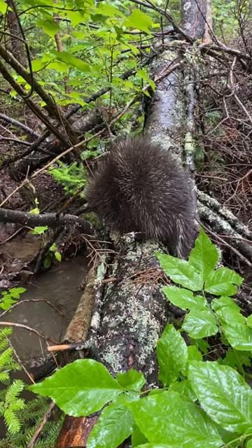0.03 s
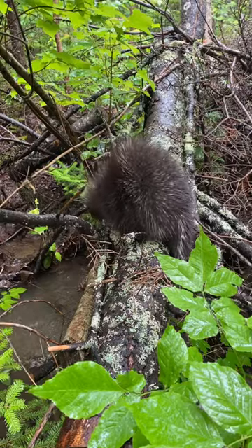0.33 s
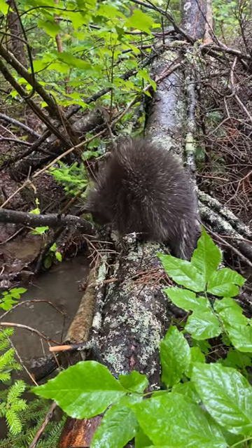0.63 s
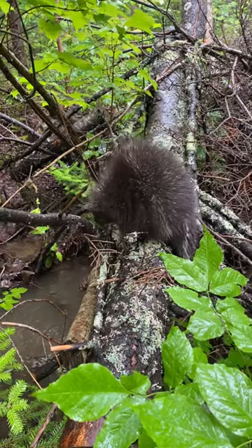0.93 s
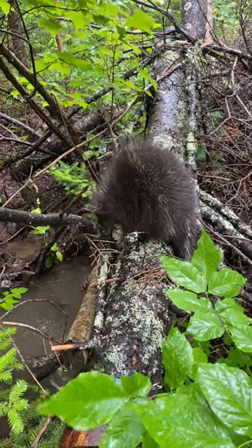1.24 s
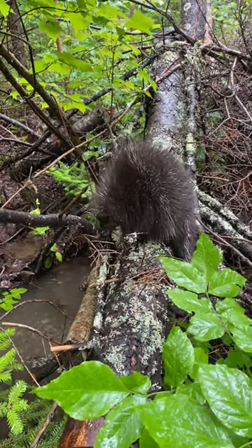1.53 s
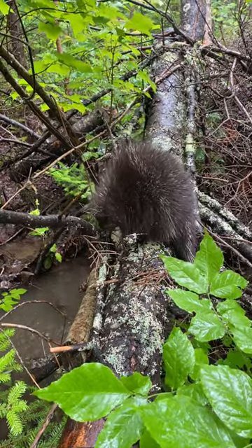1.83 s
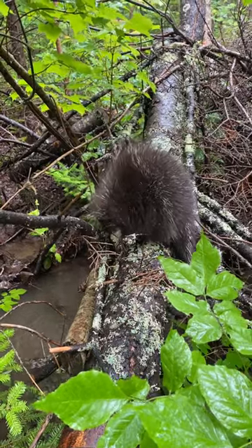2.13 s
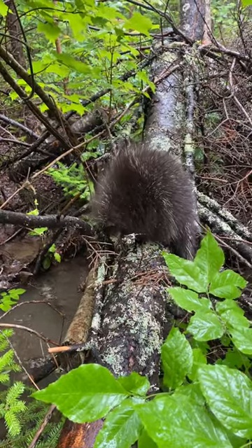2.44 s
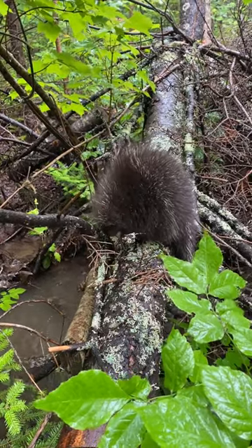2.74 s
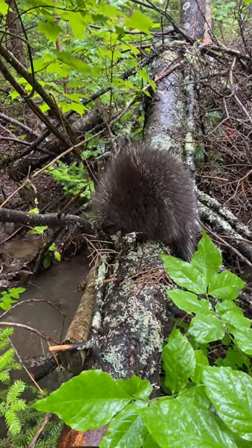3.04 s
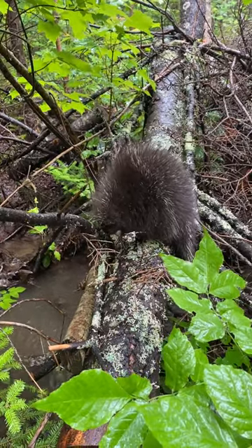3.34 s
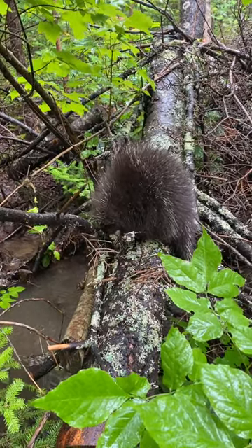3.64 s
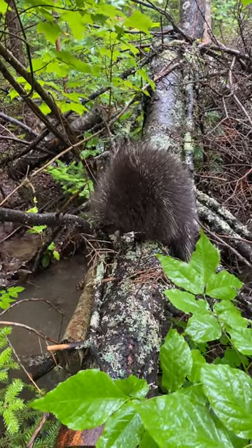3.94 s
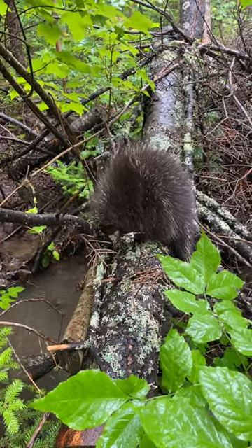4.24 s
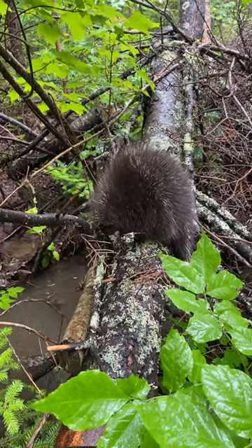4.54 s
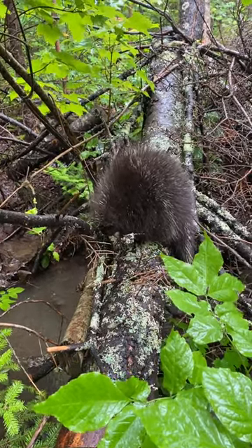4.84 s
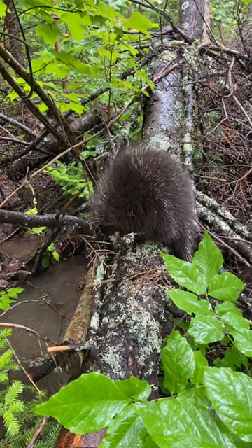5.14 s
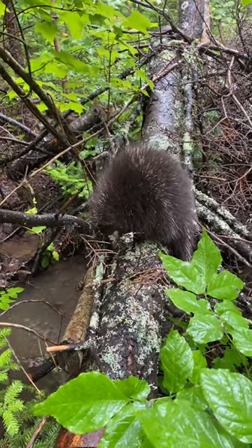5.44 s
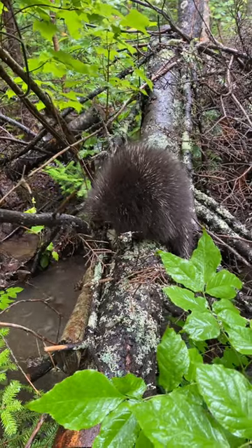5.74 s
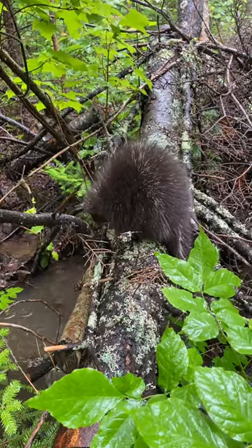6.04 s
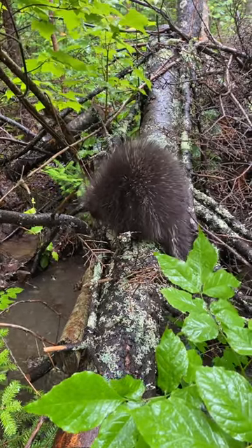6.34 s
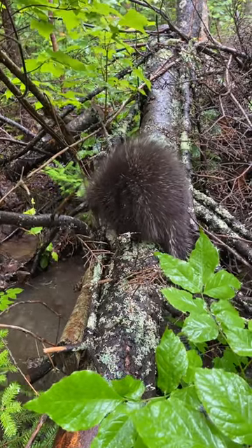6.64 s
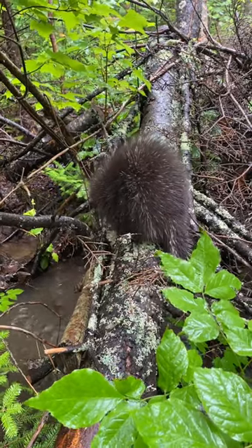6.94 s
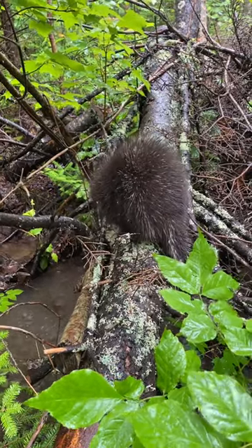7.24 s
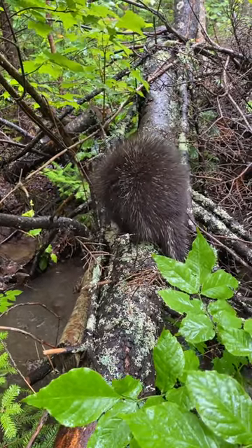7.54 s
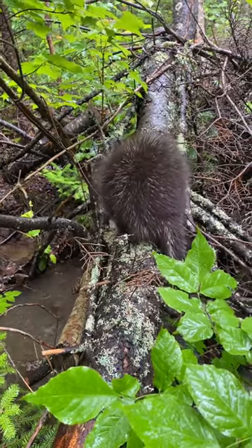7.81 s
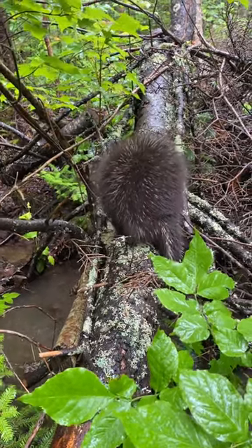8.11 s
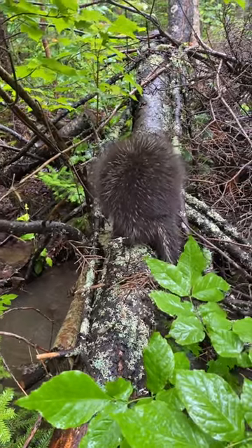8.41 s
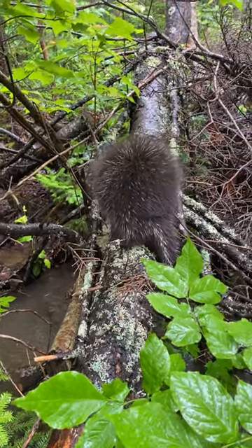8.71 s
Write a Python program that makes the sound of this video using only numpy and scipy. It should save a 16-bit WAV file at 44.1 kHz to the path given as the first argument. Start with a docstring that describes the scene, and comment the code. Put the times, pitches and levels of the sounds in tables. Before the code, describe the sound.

Steady, fairly quiet rain falls on forest leaves throughout, a wash of far drops with a nearer patter, growing slightly heavier. Faint bubbles plink in a pool over a low rumble of air. A soft puff of air and a dull rustle open the sound. Sharp drips tick on close leaves and twigs, often in the first 1.5 seconds and again from about 3.3 to 6 seconds. Light scuffs and soft knocks touch the hand-held microphone at about 1.2 and 5.1 seconds, each with a small swell of rustle. From about 6.8 seconds the rustle builds again. Between 7.2 and 7.4 seconds a quick cluster of knocks and scuffs peaks in one hard, low bump, by far the loudest sound, trailed by a brief deep hum. A clear drip ticks at 8 seconds, and a few soft knocks follow until about 8.6 seconds as the rain continues.

```python
"""Steady rain on forest leaves and a pool: a wash of far drops, a patter of nearer ones, single ticks
close to the microphone and faint plinks of bubbles in the water. Underneath, a dull rustle swells
and fades over a low rumble of air. The hand-held camera takes brief scuffs, a few soft knocks and
one hard bump. Its two microphone ports hear the treble out of step."""
import sys
import numpy as np
from scipy import signal
from scipy.fft import rfft, irfft, next_fast_len
from scipy.io import wavfile
from scipy.ndimage import map_coordinates

SR = 44100
rng = np.random.default_rng(int(sys.argv[2]) if len(sys.argv) > 2 else 0)


def persist_wave(psi):
    """Save psi, clipped to +-1, as 16-bit WAV."""
    counts = np.round(np.clip(psi, -1, 1) * 32767).astype(np.int16)
    wavfile.write(sys.argv[1], SR, np.atleast_2d(counts).T)


N = 391166


def amp(db):
    """Decibels to gain."""
    return 10 ** (np.asarray(db) / 20)


def unit(x):
    """x scaled to rms 1."""
    return x / np.sqrt(np.mean(x ** 2) + 1e-20)


def along(points, hz):
    """Read (freq_hz, value) points on a log frequency axis."""
    freqs, values = np.transpose(points)
    return np.interp(np.log(hz + 1), np.log(freqs + 1), values)


def wobble(rate_hz):
    """A smooth random curve with rate_hz knots a second."""
    knots = rng.standard_normal(int(N * rate_hz / SR) + 4)
    return map_coordinates(knots, [np.arange(N) * rate_hz / SR])


def filtered(x, response):
    """Filter x by a complex response, given as a function of frequency."""
    size = next_fast_len(N + SR // 2)
    return irfft(rfft(x, size) * response(np.fft.rfftfreq(size, 1 / SR)), size)[..., :N]


def add(track, start_s, sound):
    """Mix a sound into a track at start_s."""
    span = track[round(start_s * SR):][:len(sound)]
    span += sound[:len(span)]


def ports(pair, spectrum):
    """Two unrelated signals at the microphone ports: coloured, partly alike and out of step."""
    # likeness of left and right: freq_hz, likeness (0-1)
    alike = [(150, 0.98), (500, 0.83), (1000, 0.46), (1800, 0.88), (2650, 0.67), (3700, 0.55), (4300, 0.72),
             (5100, 0.94), (6000, 0.96), (7200, 1.0), (15000, 1)]
    # left level over right: freq_hz, balance_db
    balance = [(150, -0.5), (700, -3.5), (1400, -2), (2000, -0.5), (2800, -1.9), (4300, -1.5), (5200, -0.2)]
    # left phase ahead of right: freq_hz, lead_rad
    lead = [(100, 0), (650, -0.45), (1700, -0.06), (2600, 1.02), (3600, 0.54), (4250, 1.16), (5100, 0.14),
            (5800, 1.23), (7000, 3.12), (8200, 3.42), (10000, 6.28), (11500, 6.39), (12700, 9.33),
            (14500, 9.52), (15500, 12.39)]

    def split(hz):
        angle = np.arccos(np.clip(along(alike, hz), 0, 1)) / 2
        return amp(along(spectrum, hz)) * [np.cos(angle), np.sin(angle)]

    def skew(hz):
        half = np.array([[.5], [-.5]])
        return amp(half * along(balance, hz)) * np.exp(1j * half * along(lead, hz))

    shared, apart = filtered(pair, split)
    return filtered(np.array([shared + apart, shared - apart]), skew)


def drops(per_second, spread_db, pitch_hz, cycles):
    """Drops land at random times; each shakes its leaf, which settles within a cycle or two."""
    when, distance, tone, phase = rng.random((int(per_second * N / SR), 4)).T
    t = np.arange(128) / SR
    hz = np.clip(pitch_hz * 2 ** (3 * tone - 2), 300, 16000)[:, None]  # leaves of all sizes
    gain = amp(-spread_db * np.log(0.035 + distance))[:, None]  # few land near, many far
    envelope = gain * np.sqrt(hz) * np.exp(-t * hz / cycles)
    taps = envelope * np.cos(2 * np.pi * (hz * t + phase[:, None]))
    index = (when * N).astype(int)[:, None] + np.arange(len(t))
    return unit(np.bincount(index.ravel(), taps.ravel(), N)[:N])


def rain(start_db=-48, growth_db_per_s=0.2662, patter_db=-7, flutter_db=0.84, spray_db=-10, sway_db=3):
    """Far drops merge into a wash; nearer ones patter and throw off flurries of fine spray."""
    # spectrum of rain on foliage: freq_hz, gain_db
    foliage = [(60, -16), (200, -4), (600, -3.5), (1200, -6), (2000, -1.5), (2850, -0.9), (4000, -3),
               (4550, -4.5), (5000, -2), (6000, -3.5), (8000, -4), (10500, -8), (13000, -10.5),
               (14300, -18), (15700, -34)]
    wash = rng.standard_normal((2, N)) * amp(flutter_db * np.array([wobble(14), wobble(27)]))
    patter = np.array([drops(per_second=900, spread_db=1.5, pitch_hz=4290, cycles=0.4) for _ in range(2)])
    spray = np.array([drops(per_second=600, spread_db=2, pitch_hz=10900, cycles=0.93) for _ in range(2)])
    flurries = amp(spray_db + sway_db * np.tanh(wobble(6.6) + wobble(22)))  # tanh keeps them gentle
    level_db = start_db + growth_db_per_s * np.arange(N) / SR  # the rain slowly grows heavier
    return amp(level_db) * unit(ports(wash + amp(patter_db) * patter + flurries * spray, foliage))


def swell(start_s, rise_s, hold_s, fade_db_per_s):
    """An envelope that rises evenly, holds and dies away."""
    age = np.arange(N) / SR - start_s
    return np.clip(age / rise_s, 0, 1) * amp(-fade_db_per_s * np.maximum(age - rise_s - hold_s, 0))


def rustle(rest_db=-68, lumps_db=1.5):
    """A dull, slightly lumpy rustle comes and goes beneath the rain."""
    # swells of the rustle: start_s, rise_s, hold_s, level_db, fade_db_per_s
    swells = [(0.0, 0.034, 0.2, -54, 10), (1.21, 0.11, 0.044, -50, 20), (5.093, 0.41, 0.073, -54, 8),
              (6.75, 0.62, 1.15, -49.5, 8)]
    # spectrum of the rustle: freq_hz, gain_db
    dull = [(60, -26), (150, -5), (350, -0.5), (600, -1.5), (1000, -4.5), (1800, -10.5), (4000, -29)]
    envelopes = [amp(db) * swell(start_s, rise, hold, fade) for start_s, rise, hold, db, fade in swells]
    strength = np.sqrt(amp(rest_db) ** 2 + np.sum(np.square(envelopes), axis=0))
    return strength * amp(lumps_db * wobble(90)) * unit(ports(rng.standard_normal((2, N)), dull))


def rumble(air_db=-62, sway_db=1, puff_db=-54.5, puff_middle_s=0.23, puff_half_width_s=0.32):
    """Open air rumbles faintly at the microphone, with one soft puff a little higher in pitch."""
    # spectrum of the steady air: freq_hz, gain_db
    air_spectrum = [(20, -46), (40, -13), (70, 0.5), (120, -3.5), (250, -14), (600, -40)]
    # spectrum of the puff: freq_hz, gain_db
    puff_spectrum = [(30, -24), (75, 1), (125, 1), (190, -8), (350, -10), (800, -19), (2000, -54)]
    air = amp(air_db + sway_db * wobble(5)) * unit(ports(rng.standard_normal((2, N)), air_spectrum))
    puff_gain = amp(puff_db) * np.exp(-((np.arange(N) / SR - puff_middle_s) / puff_half_width_s) ** 2)
    return air + puff_gain * unit(ports(rng.standard_normal((2, N)), puff_spectrum))


def scuffs(resonance_q=1.2):
    """Brief rubs right by the microphone: friction noise through one broad, steep-sided resonance."""
    # scuffs and soft taps around the camera: start_s, gain_db, length_s, centre_hz
    rubs = [(0.072, -46.5, 0.023, 750), (1.244, -43.5, 0.013, 1250), (4.613, -43, 0.008, 1900),
            (5.09, -43, 0.0061, 850), (5.412, -53, .012, 900), (7.243, -44, 0.028, 1700),
            (7.247, -37.5, 0.064, 360), (7.3098, -32, 0.0036, 1350), (7.318, -29, 0.014, 1310),
            (7.32, -40.5, 0.009, 2930), (7.355, -35.5, 0.0044, 900), (7.485, -47.5, 0.016, 5900),
            (8.586, -43.5, 0.0044, 800)]
    colour = [(200, 1.0), (1000, 2.0), (2000, -1.5), (4500, 4.5), (9000, 6.5)]  # freq_hz, gain_db
    track = np.zeros(N)
    for start_s, db, length_s, centre_hz in rubs:
        size = int(length_s * SR)
        resonance = signal.iirpeak(centre_hz, resonance_q, SR)
        friction = rng.standard_normal(SR // 8)
        rub = signal.lfilter(*resonance, signal.lfilter(*resonance, friction))[-size:]
        add(track, start_s, amp(db) * unit(rub) * np.sin(np.linspace(0, np.pi, size)))
    return ports(np.array([track, np.zeros(N)]), colour)


def drips(delay_s=0.0009, splash_t60=0.0045, ring_t60=0.016, flex_hz=700, flex_t60=0.004, flex_db=-6):
    """A close drop bursts in a sharp tick; its leaf or twig flexes with a dull pat and rings briefly."""
    # drops on the nearest leaves and twigs:
    # start_s, gain_db, tick_hz, width_octaves, ring_hz, ring_db (against the tick)
    close_drops = [(0.1027, -34, 6000, 3, 1500, -10), (0.3975, -30, 2400, 0.8, 1500, -7),
                   (0.4659, -29, 2700, 1.0, 2100, -6), (0.6635, -31, 4200, 1.4, 2150, -2),
                   (0.6765, -38, 10000, 0.8, 1500, -9), (0.8392, -28, 6500, 1.8, 2000, -4),
                   (0.9487, -34.5, 2400, 0.8, 2350, 4), (1.141, -32, 3200, 1.2, 1500, -9),
                   (1.2449, -27.5, 5000, 3, 2400, 5), (1.5218, -30.5, 3500, 2.2, 1500, -12),
                   (2.2005, -30.5, 5200, 0.91, 1500, -12), (3.339, -33, 10000, 0.6, 1500, -13),
                   (3.4013, -36, 10500, 0.5, 1500, -15), (3.436, -38, 5300, 1.5, 1500, -3),
                   (3.9209, -32, 12000, 0.6, 1500, -12), (3.952, -37, 2900, 1, 3050, -9),
                   (4.074, -40, 5000, 1, 5000, -9), (4.1795, -35, 10500, 0.9, 1500, -14),
                   (4.2666, -33, 6800, 0.9, 1500, -13), (4.33, -35, 2900, 0.7, 2900, -2),
                   (4.418, -41, 9000, 1.2, 1500, -11), (4.54, -32.5, 8000, 1.5, 1500, -9),
                   (4.6107, -28, 2700, 1.1, 2870, 0), (5.1373, -26.5, 3700, 2.3, 3500, -3),
                   (5.187, -32, 2500, 1, 2200, -9), (5.2439, -26.5, 3000, 2.3, 3200, -4),
                   (5.6125, -34.5, 2800, 0.74, 2830, 2), (5.62, -37, 10000, 0.8, 1500, -12),
                   (5.70, -33, 8000, 1.2, 1500, -6), (5.8852, -36, 3100, 1, 3100, -9),
                   (5.965, -36, 5000, 1.2, 1500, -6), (7.173, -25, 5300, 1.7, 1540, -4.5),
                   (8.0056, -24, 3500, 1.4, 2300, -12), (8.2422, -31, 6000, 1.1, 1500, -9)]
    colour = [(200, 7.1), (2500, 7.5), (5000, 10.0), (8000, 13.3), (15000, 3.2)]  # freq_hz, gain_db
    track, t = np.zeros(N), np.arange(SR // 40) / SR
    for start_s, db, tick_hz, octaves, ring_hz, ring_db in close_drops:
        edges_hz = np.clip(tick_hz * 2 ** (octaves * np.array([-.5, .5])), 100, [15000, 20000])
        splash = rng.standard_normal(len(t)) * amp(-60 * t / splash_t60)
        tick = signal.lfilter(*signal.butter(1, edges_hz, "bandpass", fs=SR), splash)
        ring = np.sin(2 * np.pi * ring_hz * t) * amp(-60 * t / ring_t60)
        pat = np.sin(2 * np.pi * flex_hz * t) * amp(-60 * t / flex_t60)
        parts = [(tick, 0), (ring, ring_db), (pat, flex_db)]
        drip = sum(amp(part_db) * part / np.linalg.norm(part) for part, part_db in parts)
        add(track, start_s + delay_s, amp(db) * drip)
    return ports(np.array([track, np.zeros(N)]), colour)


def plinks(per_second=14, pitch_hz=2950, octaves=0.35, cycles=13, rise=0.039, faint_db=-51, spread_db=1.9):
    """Drops on the pool trap small bubbles that ring and rise in pitch: a few clear, many faint."""
    # the clearest bubbles: start_s, gain_db, pitch_hz
    clear = [(0.5628, -42, 2780), (1.777, -42, 1710), (3.952, -43, 3050), (4.074, -45, 5000),
             (4.4355, -51, 10900), (5.885, -42, 3120)]
    colour = [(1000, -5), (3000, 4.0), (9000, 14.0)]  # freq_hz, gain_db
    count = int(per_second * N / SR)
    starts_s = rng.random(count) * N / SR
    faint = [(start_s, faint_db + spread_db * strength, pitch_hz * 2 ** (octaves * tone))
             for start_s, (tone, strength) in zip(starts_s, rng.standard_normal((count, 2)))]
    track, t = np.zeros(N), np.arange(SR // 25) / SR
    for start_s, db, hz in clear + faint:
        age = t * hz / cycles  # in decay times
        envelope = np.exp(-age) * (1 - np.exp(-10 * age))
        ring = np.sin(2 * np.pi * hz * t * (1 + rise * age / 2))
        add(track, start_s, amp(db) * envelope * ring)
    return ports(np.array([track, np.zeros(N)]), colour)


def knock(corner_hz, body_hz=62, lag_cycles=1.36, tilt=0.65, leak_db=-30):
    """A push on the camera body; each frequency arrives a cycle or so late, so the thud falls in pitch."""
    hz = np.fft.rfftfreq(SR // 2, 1 / SR) + 1
    bass_cut = 1 / np.sqrt(1 + (body_hz / hz) ** 8)
    contact = 1 / np.sqrt(1 + (hz / corner_hz) ** 10)
    treble_leak = amp(leak_db) / (1 + (hz / (6 * corner_hz)) ** 2)
    lag = np.exp(-2j * np.pi * lag_cycles * np.log(hz))
    thud = irfft(bass_cut * (contact + treble_leak) * hz ** -tilt * lag)[:SR // 4]
    return thud / np.abs(thud).max()


def handling(hum_start_s=7.37, hum_length_s=0.23, hum_hz=48, hum_db=-42, left_lag_s=0.00014):
    """Knocks travel through the body and reach the left port later; a deep hum follows the hard bump."""
    # knocks on the camera body: start_s, peak_db, corner_hz (higher is harder)
    knocks = [(1.2495, -42.5, 480), (5.091, -37, 308), (5.419, -41, 100), (7.239, -31.5, 300),
              (7.2518, -13.5, 124), (7.2567, -25, 330), (7.28, -23.5, 260), (7.31, -21, 800),
              (7.3244, -4, 624), (7.3579, -21, 430), (8.078, -47, 280), (8.183, -48, 350),
              (8.594, -50, 250), (8.639, -39, 380)]
    track = np.zeros(N)
    for start_s, db, corner_hz in knocks:
        add(track, start_s, amp(db) * knock(corner_hz))
    t = np.arange(int(hum_length_s * SR)) / SR
    hum = np.sin(np.pi * t / hum_length_s) * np.sin(2 * np.pi * hum_hz * t)
    add(track, hum_start_s, amp(hum_db) * hum)
    left = filtered(track, lambda hz: np.exp(-2j * np.pi * hz * left_lag_s))
    return np.array([left, track])


def scene():
    """Forest rain near and far, with the camera's own scuffs and knocks on top."""
    return rain() + rustle() + rumble() + scuffs() + drips() + plinks() + handling()


def record(dry, start_s=0.035, fade_in_s=0.002, top_hz=15750):
    """The camera's microphone opens a moment late and keeps nothing above its band limit."""
    running = np.clip((np.arange(N) / SR - start_s) / fade_in_s, 0, 1)
    return filtered(dry * running, lambda hz: hz < top_hz)


dry = scene()
out = record(dry)
persist_wave(out)
```